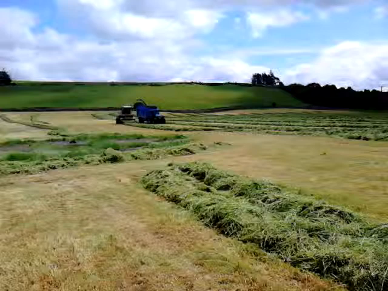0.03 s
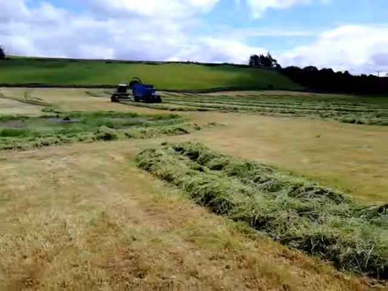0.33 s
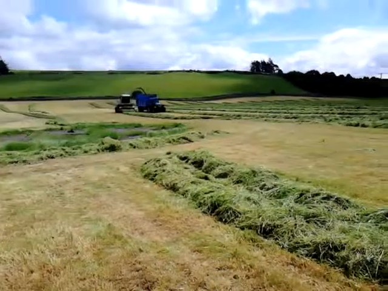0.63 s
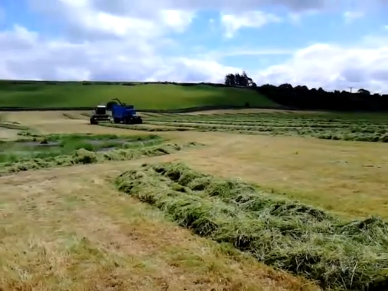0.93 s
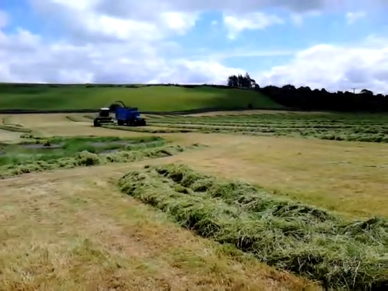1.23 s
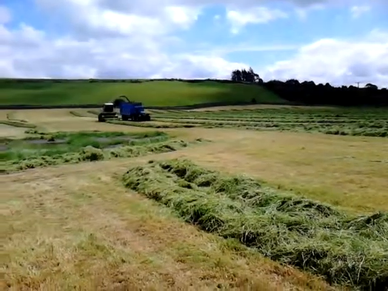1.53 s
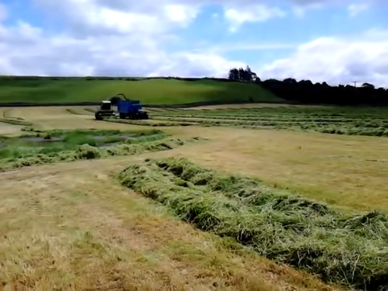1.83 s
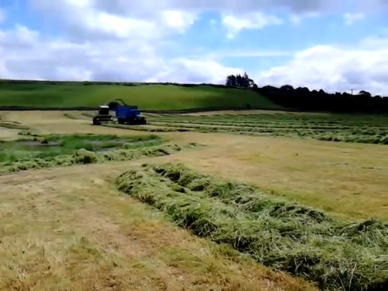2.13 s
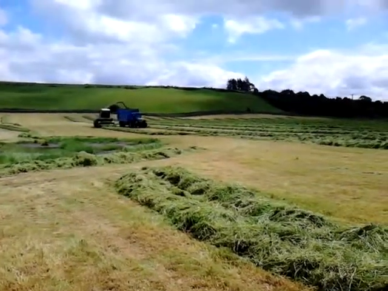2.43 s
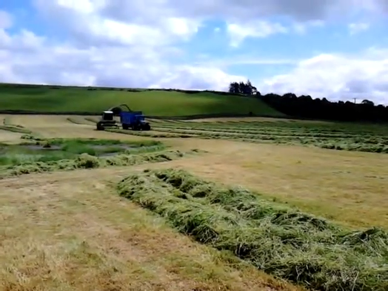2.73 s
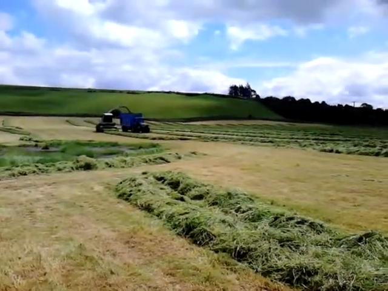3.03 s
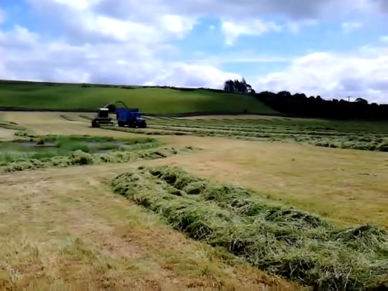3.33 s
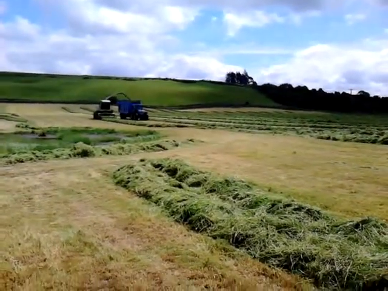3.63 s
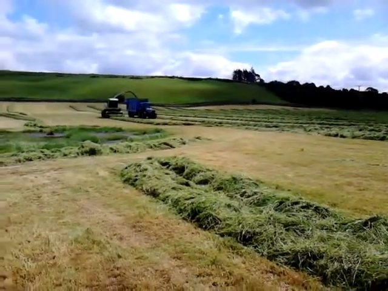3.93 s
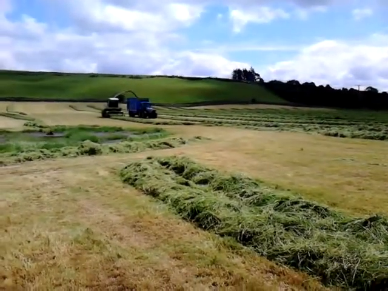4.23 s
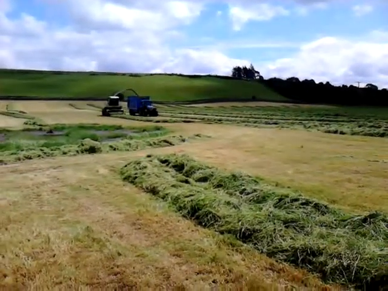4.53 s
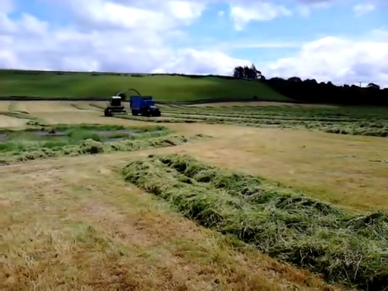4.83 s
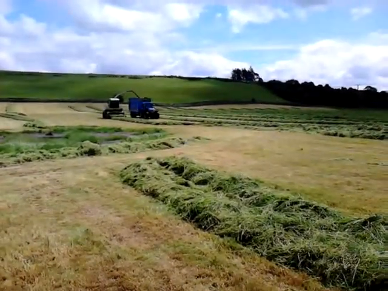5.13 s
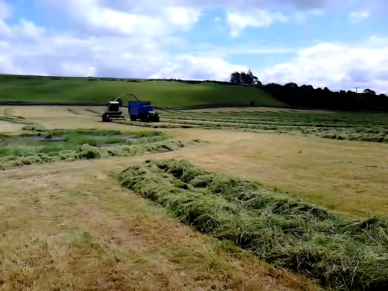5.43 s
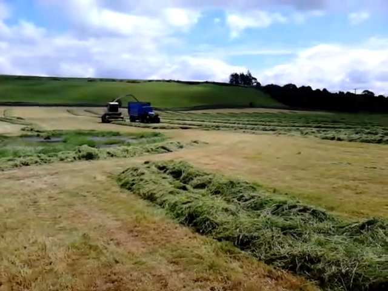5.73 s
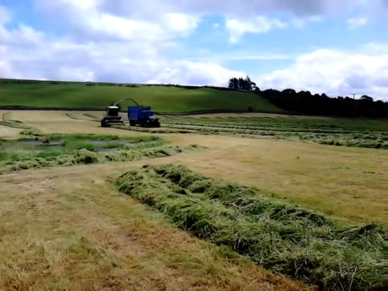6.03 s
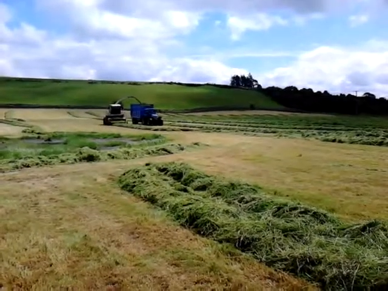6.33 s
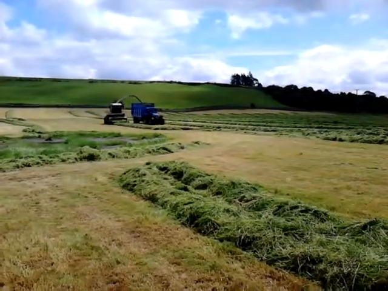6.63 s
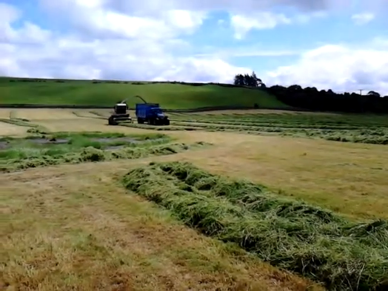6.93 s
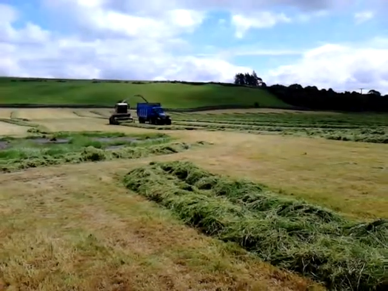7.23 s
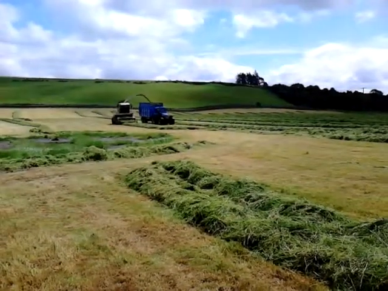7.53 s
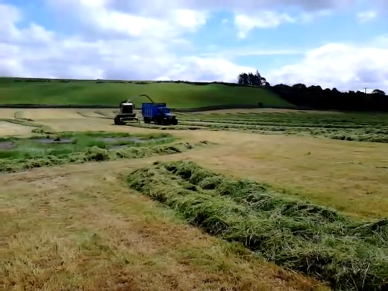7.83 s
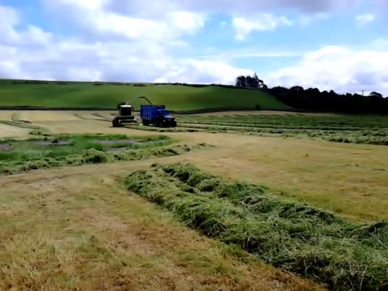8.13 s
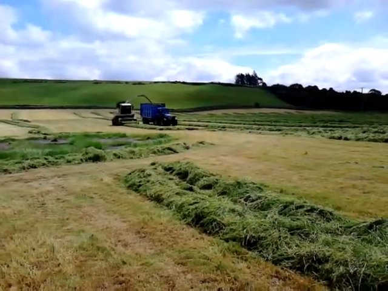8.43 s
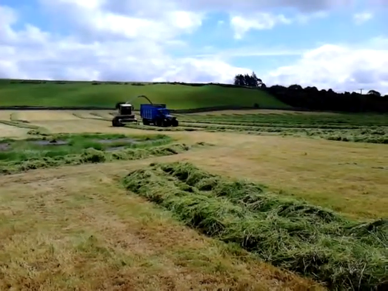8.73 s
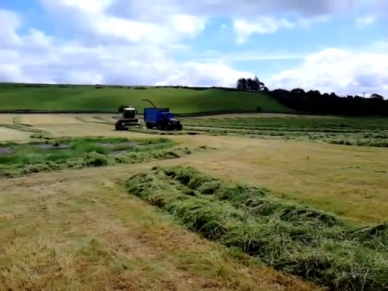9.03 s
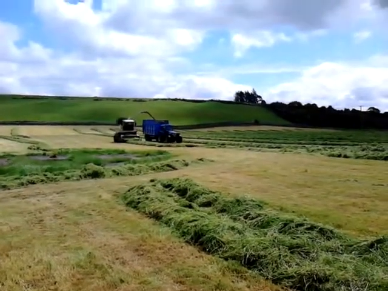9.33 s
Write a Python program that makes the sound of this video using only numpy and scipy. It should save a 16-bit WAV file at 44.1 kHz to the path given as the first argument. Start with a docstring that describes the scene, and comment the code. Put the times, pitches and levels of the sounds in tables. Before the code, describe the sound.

Wind gusts rumble and thump on the microphone while a forage harvester and tractor drone and clatter steadily some way off.

```python
"""After a short silence, gusts buffet a microphone in a mown field: turbulent eddies rumble and thump.
Some way off a forage harvester and a tractor are at work. A six-cylinder diesel runs at a steady speed:
combustion rings its block, injectors and valves clatter, covers clank, and a thin whine throbs with
the firing. Behind it lie faint high squeaks and the steady rush of the far machines and the field."""
import sys
import numpy as np
from scipy import signal
from scipy.fft import rfft, irfft, next_fast_len
from scipy.io import wavfile
from scipy.ndimage import uniform_filter1d, map_coordinates

SR = 44100
rng = np.random.default_rng(int(sys.argv[2]) if len(sys.argv) > 2 else 0)


def store_wav(level_fs):
    """Save 16-bit WAV to argv[1]."""
    pcm = np.round(np.clip(np.atleast_2d(level_fs), -1, 1) * 32767)
    wavfile.write(sys.argv[1], SR, pcm.T.astype(np.int16))


N = 422478

OPENS_S, CUTOFF_HZ = .809, 13600
FIRING_HZ, FIRST_FIRING = 46.2, .2   # firing rate; starting lag in firing intervals

# Gusts. Each row: start in seconds, length in seconds, relative rumble and flutter levels in dB.
GUSTS = [(0.84, 0.02, -21.5, -27), (1.113, 0.11, -18, -25.5), (1.346, 0.18, -19, -25.5),
         (1.678, 0.15, -16.5, -22), (1.879, 0.16, -19.5, -20.5), (1.988, 0.078, -16, -17.5),
         (2.338, 0.018, -21.5, -20.5), (2.451, 0.059, -18, -26), (2.973, 0.015, -31, -33),
         (3.19, 0.023, -22, -29), (3.343, 0.018, -20, -21.5), (3.415, 0.019, -23.5, -40),
         (3.935, 0.07, -22.5, -21), (4.132, 0.018, -23, -31), (4.196, 0.02, -19.5, -20.5),
         (4.353, 0.15, -19, -33), (4.512, 0.064, -16.5, -20), (4.646, 0.18, -19, -20.5),
         (4.868, 0.084, -17.5, -21.5), (5.151, 0.032, -18.5, -27.5), (5.313, 0.11, -18, -25),
         (5.647, 0.1, -17.5, -21), (5.892, 0.035, -17.5, -22), (6.002, 0.13, -17.5, -20.5),
         (6.216, 0.017, -16, -33), (6.958, 0.084, -20, -38), (7.05, 0.027, -16.5, -20),
         (7.144, 0.19, -18, -20), (7.42, 0.032, -17, -19.5), (7.488, 0.015, -19, -23),
         (7.586, 0.021, -19, -17), (7.675, 0.019, -24, -18.5), (7.73, 0.043, -16, -18),
         (7.826, 0.028, -19.5, -20), (7.921, 0.021, -17.5, -13.5), (8.027, 0.087, -18.5, -19.5),
         (8.184, 0.17, -22.5, -24.5), (8.454, 0.21, -20, -21.5), (8.61, 0.12, -18, -28.5),
         (8.768, 0.14, -18, -22.5), (8.996, 0.23, -19.5, -23.5), (9.301, 0.037, -17.5, -21),
         (9.42, 0.17, -22, -44)]
# The hardest eddies at the microphone port. Each row: time in seconds, relative level in dB, pitch in Hz.
BUFFETS = [(1.173, -3.5, 230), (1.656, -7, 450), (1.716, -7.5, 320), (1.734, -3.5, 620), (1.756, -6, 280),
           (1.803, -9, 180), (1.907, -7, 320), (1.945, -6.5, 320), (1.971, -7, 210), (2.009, -1, 210),
           (2.022, -3, 250), (2.048, -3, 400), (2.351, -7.5, 296), (2.41, -2.5, 149), (2.417, -9, 149),
           (2.532, -6, 450), (2.566, -7.5, 240), (2.972, -2.5, 157), (3.95, -5.5, 218), (4.212, -8, 300),
           (4.428, -12, 150), (4.496, -3.5, 160), (4.527, -8, 370), (4.54, -4, 397), (4.603, -9, 170),
           (4.661, -7.5, 210), (4.734, -6.5, 170), (4.753, -5.5, 500), (4.866, -6, 323), (4.89, -8, 170),
           (4.905, -3, 230), (4.93, -9, 170), (5.309, -8.5, 180), (5.347, -9, 240), (5.363, 2.5, 335),
           (5.673, -13, 180), (5.692, -6, 150), (5.75, -8, 220), (5.899, -2, 140), (5.911, -5, 170),
           (5.928, 0, 180), (6.015, 0.5, 380), (6.022, -7, 850), (6.03, -5, 880), (6.051, -6, 895),
           (6.056, 0.5, 260), (6.092, -3, 520), (6.138, -6.5, 200), (6.177, -9, 160), (6.212, -17, 160),
           (6.226, -5, 284), (7.085, -3, 380), (7.157, -2, 228), (7.213, -5, 248), (7.252, -2, 220),
           (7.27, -5, 350), (7.289, -2, 416), (7.319, -4, 160), (7.331, -8, 250), (7.418, -1.5, 256),
           (7.506, -3, 150), (7.724, -3, 260), (7.735, -4, 700), (7.758, -6, 240), (7.832, -6, 440),
           (7.933, 0, 340), (7.944, -7, 320), (8.06, -9, 210), (8.084, -9, 560), (8.448, -6.5, 180),
           (8.53, -5, 920), (8.534, -1, 350), (8.548, -6, 380), (8.551, -4, 900), (8.556, -7.5, 580),
           (8.563, -4.5, 840), (8.588, -6, 775), (8.6, -6, 780), (8.623, -7, 450), (8.633, -3.5, 298),
           (8.652, -4.5, 232), (8.769, -7, 160), (8.79, -5, 283), (8.849, 0.5, 277), (8.856, 1, 523),
           (8.868, -3, 340), (8.917, -5, 330), (9.003, -9, 217), (9.1, -5.5, 243), (9.198, -3.5, 308)]
# Flares of the rasp. Each row: time of the peak in seconds, half length in seconds, level in dB.
FLARES = [(1.722, .02, -24), (2.024, 0.029, -24), (6.042, 0.025, -30), (8.487, 0.033, -28),
          (8.538, 0.021, -22.5), (8.604, 0.026, -24), (8.866, 0.016, -27)]
# Spectra of the wind. Each row: frequency in Hz, relative spectral density in dB.
RUMBLE_SPECTRUM = [(12, -34), (25, -24), (45, -3), (90, 1), (170, 0), (250, -7), (400, -13), (800, -84)]   # large, slow eddies
FLUTTER_SPECTRUM = [(100, -35), (200, 6), (300, 1), (450, 0), (700, -5), (1100, -14.5), (1800, -30),
                    (3500, -33), (8000, -34.5)]   # small, quick eddies
RASP_SPECTRUM = [(400, 11), (900, -10), (1500, -4), (2500, -24), (4500, -34)]   # hard gusts on the port's edge
FLARE_SPECTRUM = [(450, -6), (700, -1), (1000, 4), (1500, -22), (2200, -19), (3500, -46)]   # flow tearing right off that edge
# Knock of the cylinders, in firing order. Each entry: relative strength in dB, scaled by `uneven`.
CYLINDERS = [11.5, 7.5, -1, 9, 5, 3]
# Forward skips of the beat. Each row: time in seconds, size in firing intervals.
SKIPS = [(2.12, .39), (4.42, .63)]
# Modes of the block and its covers. Each row: frequency in Hz, bandwidth in Hz, relative gain in dB.
BLOCK_MODES = [(537, 11, -22), (702, 35, -7.5), (1495, 62, -5), (1820, 38, -7.5), (1944, 156, -6),
               (2193, 64, -8.5), (2355, 54, -11), (2526, 57, -6), (3024, 85, -10.5)]
# Injector and valve clatter. Each row: frequency in Hz, relative spectral density in dB.
CLATTER_SPECTRUM = [(1500, -9), (2200, 8.5), (2750, -22), (3350, 3), (3650, -4), (3950, 9.5), (4280, 4.5),
                    (4420, 1), (5000, -2.5), (5900, -4), (7100, 4.5), (8000, -5), (9100, -10), (11500, -12),
                    (13800, -34)]
# Strong harmonics of the engine cycle. Each row: frequency in Hz, rms level in dB.
HARMONICS = [(184.8, -44), (308, -38), (508.2, -43.5), (531.3, -42), (554.4, -42.5), (654.5, -44),
             (970.2, -52), (993.3, -50), (1224.3, -45), (1547.7, -48.5), (1801.8, -53.5), (2356.2, -49),
             (2402.4, -49), (2517.9, -70)]
# Valve gear striking its cover. Each row: place in firing intervals, relative tap and rebound in dB.
VALVE_TAPS = [(.17, 0, -9), (1.17, -8, -15), (1.99, -13, -17), (3.11, -4.5, -6.5), (4.17, -3.5, -12),
              (5.09, -13, -15)]
# Knocks of a looser panel. Each row: place in firing intervals, relative level in dB.
PANEL_TAPS = [(.37, -5), (1.18, 0), (1.88, -5.5), (2.32, -5.5), (3.9, -4), (4.3, -4.5), (5.38, 1),
              (5.95, -4)]
# Coupled modes of the valve cover and of the panel. Each row: frequency in Hz, bandwidth in Hz.
COVER_MODES = [(1255, 115), (1287, 125), (1320, 120)]
PANEL_MODES = [(975, 150), (1000, 170), (1030, 170)]
# How strongly the whine carries across the field. Each row: time in seconds, level in dB.
WHINE_LEVEL = [(0.8, -41), (1.3, -40.9), (1.75, -43.7), (2.3, -41.4), (2.8, -42.3), (4.1, -41.8),
               (5.8, -42.8), (7.25, -42.2), (7.6, -39.3), (8.1, -41), (9.58, -41.2)]
# Far squeaks. Each row: time of the peak in seconds, level in dB, pitch in Hz, half length in seconds.
SQUEAKS = [(1.25, -46, 6640, .12), (3.58, -44, 4070, .05), (3.97, -44, 4880, .12), (4.17, -44, 4980, .11),
           (4.4, -45, 3920, 0.054), (8.26, -46, 5670, .15)]
# Spectra of the background. Each row: frequency in Hz, relative spectral density in dB.
RUSH_SPECTRUM = [(20, -2), (45, 0), (180, -3), (270, -12.5), (380, -7), (620, -14), (1100, -13.5),
                 (1700, -17.5), (3000, -24), (8000, -30), (13000, -140)]   # the far machines and the field
SIDE_HISS_SPECTRUM = [(450, -26), (800, -51), (1200, -7), (2200, 7), (3200, -12.5), (4200, -9.5),
                      (7000, -4), (9000, -18), (12000, -17)]   # hiss that differs between the channels


def wind():
    """Turbulence at the port makes a lumpy rumble, flutter and rasp, and thumps louder in a gust."""
    rumble_db, flutter_db = 20 * np.log10(airflow())
    lumps = drift(61)
    rumble = evened(coloured(noise(), RUMBLE_SPECTRUM), span_s=.094)
    rumble *= evened(from_db(2 * lumps), span_s=.11)
    flutter = evened(coloured(noise() * from_db(4.7 * lumps), FLUTTER_SPECTRUM), span_s=.075)
    rasp = evened(coloured(noise() * from_db(4.5 * lumps), RASP_SPECTRUM), span_s=.04)
    rasp_db = -33 + .88 * (flutter_db + 13)
    eddies = buffets(BUFFETS + lesser_eddies(rumble_db))
    return (from_db(rumble_db + 1.03) * rumble + from_db(flutter_db - .5) * flutter
            + from_db(rasp_db) * rasp + eddies)


def airflow(attack_s=.041, release_s=.048):
    """Envelopes of rumble and flutter: each gust grows exponentially, holds and relaxes to the breeze."""
    t = np.arange(N) / SR
    rumble, flutter = from_db(-27.5), from_db(-34.5)   # light air between gusts
    for start, length, rumble_db, flutter_db in GUSTS:
        before, after = np.maximum(start - t, 0), np.maximum(t - start - length, 0)
        shape = np.exp(-before / attack_s - after / release_s)
        rumble = np.maximum(rumble, from_db(rumble_db) * shape)
        flutter = np.maximum(flutter, from_db(flutter_db) * shape)
    surge = evened(from_db(2.5 * drift(8.4)), span_s=.09)
    return rumble * surge, flutter * surge


def buffets(eddies):
    """A passing eddy gives suction, then pressure, inside a ragged wake; a smaller one is quicker."""
    out, t, white = np.zeros(N), np.arange(N) / SR, noise()
    for time, db, hz in eddies:
        near = slice(*np.searchsorted(t, [time - .03, time + .05]))
        turns = (t[near] - time) * hz
        angle = 2 * np.pi * turns
        pulse = angle * np.exp((1 - angle * angle) / 2)
        swell = np.exp(-np.abs(turns) / np.where(turns > 0, 2, 1))   # falls half as fast as it rises
        wake = band(white[near] * swell, 1.2 * hz, width_hz=1.4 * hz)
        wake /= np.abs(wake).max() + 1e-12
        out[near] += from_db(db - 2.5) * (pulse + .45 * wake)
    return out


def lesser_eddies(rumble_db, per_s=22, median_hz=175):
    """Eddies arrive as a Poisson process, louder in a stronger gust; rows as in BUFFETS."""
    births = np.flatnonzero(rng.random(N) < per_s / SR)
    octaves = .35 * noise()
    return [(i / SR, rumble_db[i] + 4.5, median_hz * 2 ** octaves[i]) for i in births]


def flares():
    """Flow separation at the port's edge gives a brief, hoarse rush in the hardest gusts."""
    level = sum(from_db(db) * bell_curve(time, half_s) for time, half_s, db in FLARES)
    ragged = noise() * from_db(4.2 * drift(70))
    return level * evened(coloured(ragged, FLARE_SPECTRUM), span_s=.042)


def diesel():
    """Periodic combustion times every engine sound, so all follow a running count of firings."""
    t = np.arange(N) / SR
    firings = np.cumsum(FIRING_HZ * (1 + .000527 * drift(2.66))) / SR - FIRST_FIRING
    beat = firings - sum(skipped * (t < time) for time, skipped in SKIPS)
    rattling = ground_echo(knock(beat) + clatter(beat))
    return rattling + drone(firings) + covers(beat) + whine(beat)


def knock(firings):
    """Combustion excites the modes of the block, with nearly the same grain in every cycle."""
    force = blows(firings, rise=.1, decay=.22, floor=.09, uneven=.3) * rattle(firings, repeat=.8)
    body = sum((-1) ** k * from_db(db) * resonance(force, hz, width)
               for k, (hz, width, db) in enumerate(BLOCK_MODES))
    return from_db(-37.5) * rms_one(body)


def clatter(firings):
    """Brief impacts of injectors and valves give a bright, broad spectrum, blurred by distance."""
    force = blows(firings, rise=.25, decay=.3, floor=.9, uneven=.95) * rattle(firings, repeat=.4)
    return from_db(-38) * coloured(force, CLATTER_SPECTRUM)


def blows(firings, rise, decay, floor, uneven):
    """Each firing is a force pulse as strong as its cylinder; rise and decay are in firing intervals."""
    since = firings % 1
    shape = (1 - np.exp(-since / rise)) * np.exp(-since / decay)
    cylinder = np.floor(firings).astype(int) % len(CYLINDERS)
    strength = from_db(uneven * np.array(CYLINDERS))[cylinder]
    return floor + strength * shape / shape.max()


def rattle(firings, repeat):
    """Fine contacts act as noise: the share `repeat` of its power recurs each cycle, the rest is new."""
    size = int(len(CYLINDERS) * SR / FIRING_HZ)
    pattern = rng.standard_normal(size)
    recurring = map_coordinates(pattern, [firings / len(CYLINDERS) % 1 * size], order=3, mode="wrap")
    return np.sqrt(repeat) * recurring + np.sqrt(1 - repeat) * noise()


def drone(firings):
    """A periodic source radiates harmonics; a few stand out as tones that waver in the moving air."""
    cycles, cycle_hz = firings / len(CYLINDERS), FIRING_HZ / len(CYLINDERS)
    tones = np.zeros(N)
    for hz, db in HARMONICS:
        amplitude = np.sqrt(2) * from_db(db + 1.3 * drift(1.5))
        tones += amplitude * np.sin(2 * np.pi * (round(hz / cycle_hz) * cycles + rng.random()))
    return tones


def covers(firings, rebound_s=.0089):
    """Struck plates ring at their modes: the valve cover and a lower, looser panel clank in a gallop."""
    taps = [(place, db) for place, db, _ in VALVE_TAPS]
    rebounds = [(place + rebound_s * FIRING_HZ, db) for place, _, db in VALVE_TAPS]
    cover = from_db(-34.2) * clank(firings, taps + rebounds, COVER_MODES)
    panel = from_db(-40.3) * clank(firings, PANEL_TAPS, PANEL_MODES)
    return cover + panel


def clank(firings, taps, modes, jitter_s=.00004):
    """Taps recur each cycle, never quite alike; coupled modes make each swell for a few milliseconds."""
    plate = np.zeros(N)
    for place, db in taps:
        cycle = (firings + FIRST_FIRING - place) // len(CYLINDERS)
        hits = np.flatnonzero(np.diff(cycle) > 0)
        scatter_db, late = rng.standard_normal((2, 100))[:, :len(hits)]
        hits = np.clip(hits + np.round(late * jitter_s * SR).astype(int), 0, N - 1)
        plate[hits] += from_db(db + scatter_db)
    for hz, width in modes:
        plate = resonance(plate, hz, width)
    return rms_one(plate)


def whine(firings, start_hz=4248.3, sag_hz_per_s=.7):
    """Amplitude and phase modulation, at the firing rate and at half of it, make a thin tone throb."""
    t = np.arange(N) / SR
    hz = start_hz - sag_hz_per_s * t + drift(4)
    beat = 2 * np.pi * (firings - .22)
    throb = 1 + .62 * np.cos(beat) + .3 * np.cos(beat / 2)
    lag_radians = .15 * np.sin(beat) + .25 * np.sin(beat / 2)
    tone = np.sin(2 * np.pi * np.cumsum(hz) / SR - lag_radians) * from_db(.5 * drift(6))
    breath = .09 * rms_one(band(noise(), start_hz, width_hz=130))
    level_db = np.interp(t, *np.transpose(WHINE_LEVEL))
    return from_db(level_db) * rms_one(throb * (tone + breath))


def ground_echo(direct, reflection=.4):
    """Direct and ground-reflected sound interfere; moving air varies the lag, so the colour shifts."""
    lag_s = .003 + .00012 * drift(1.5)
    echo = np.interp(np.arange(N) - lag_s * SR, np.arange(N), direct)
    return (direct + reflection * echo) / np.hypot(1, reflection)


def squeaks():
    """Narrow-band noise is heard as pitch: breathy whistles swell and fade across the field."""
    white = noise()
    return sum(from_db(db) * bell_curve(time, half_s) * rms_one(band(white, hz, width_hz=400))
               for time, db, hz, half_s in SQUEAKS)


def rush():
    """Incoherent sound from the far machines and the field sums to a steady noise."""
    return from_db(-25.5) * coloured(noise(), RUSH_SPECTRUM)


def from_db(db):
    """Decibels to amplitude ratio."""
    return 10 ** (np.asarray(db) / 20)


def rms_one(x):
    """Scale to unit rms."""
    return x / np.sqrt(np.mean(x ** 2) + 1e-20)


def noise():
    """White Gaussian noise of unit variance."""
    return rng.standard_normal(N)


def bell_curve(peak_s, half_s):
    """Gaussian envelope that falls to 1/e at half_s either side of its peak."""
    return np.exp(-((np.arange(N) / SR - peak_s) / half_s) ** 2)


def drift(rate):
    """Low-passed noise of unit rms that changes about `rate` times a second."""
    pole = np.exp(-40 * np.pi * rate / SR)
    white = rng.standard_normal(N // 20 + 4002)
    slow = signal.lfilter([1], [1, -2 * pole, pole * pole], white)[4000:]
    return np.interp(np.arange(N) / 20, np.arange(len(slow)), rms_one(slow))


def coloured(x, spectrum):
    """Filter x by multiplying its spectrum with a gain curve; the result has unit rms."""
    size = next_fast_len(N)
    hz, db = np.transpose(spectrum)
    bins = np.maximum(np.arange(size // 2 + 1) * SR / size, 1)
    gain = from_db(np.interp(np.log(bins), np.log(hz), db, left=-100, right=-100))
    return rms_one(irfft(rfft(x, size) * gain, size)[:N])


def resonance(x, hz, width_hz):
    """A damped oscillator: two-pole band-pass with unit gain at its peak."""
    radius = np.exp(-np.pi * width_hz / SR)
    feedback = [1, -2 * radius * np.cos(2 * np.pi * hz / SR), radius ** 2]
    return signal.lfilter(np.array([1, 0, -1]) * (1 - radius ** 2) / 2, feedback, x)


def band(x, hz, width_hz):
    """Two equal resonances in cascade give a band with steeper skirts."""
    return resonance(resonance(x, hz, width_hz), hz, width_hz)


def evened(x, span_s):
    """Division by the running rms holds the short-term level near 1."""
    size = max(int(span_s * SR), 2)
    return x / np.sqrt(uniform_filter1d(uniform_filter1d(x * x, size), size) + 1e-9)


def scene():
    """The sources superpose in the middle; only a faint hiss, in opposite phase left and right, is wide."""
    middle = diesel() + rush() + squeaks() + wind() + flares()
    side = from_db(-60) * coloured(noise(), SIDE_HISS_SPECTRUM)
    return np.array([middle + side, middle - side])


def record(dry):
    """The microphone opens; soft saturation rounds the hardest buffets and a low-pass cuts the top."""
    live = np.arange(N) / SR >= OPENS_S
    rounded = dry / (1 + dry ** 4) ** .25
    low_pass = signal.ellip(10, .1, 80, CUTOFF_HZ, fs=SR, output="sos")
    return signal.sosfilt(low_pass, rounded * live)


dry = scene()
out = record(dry)
store_wav(out)
```